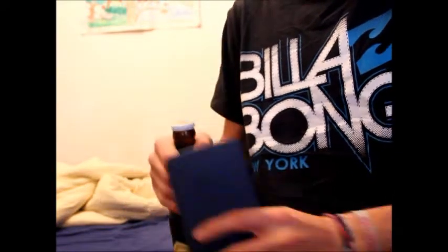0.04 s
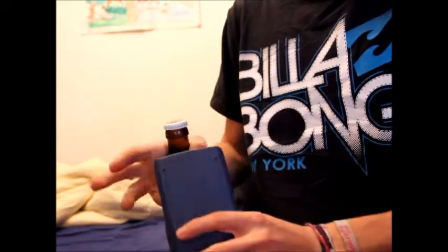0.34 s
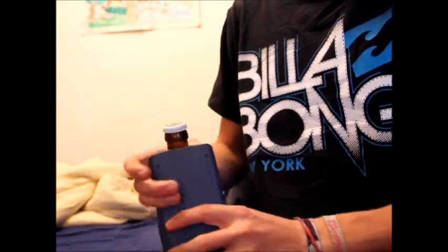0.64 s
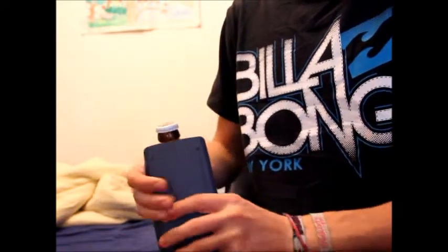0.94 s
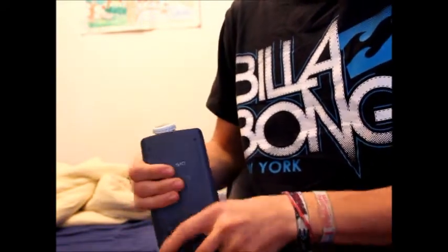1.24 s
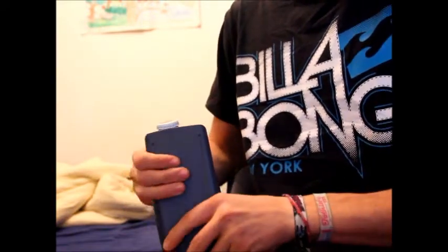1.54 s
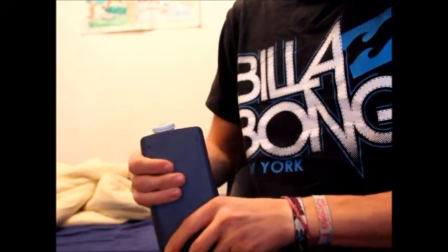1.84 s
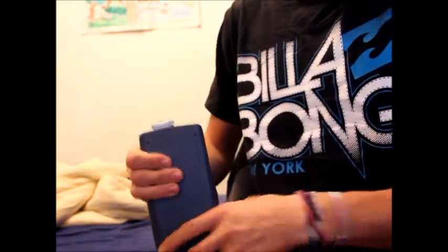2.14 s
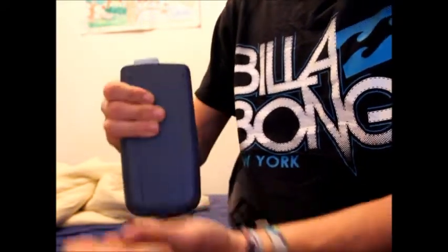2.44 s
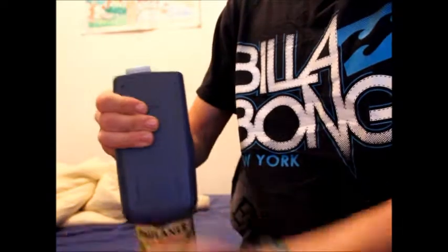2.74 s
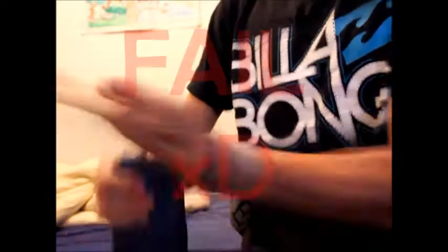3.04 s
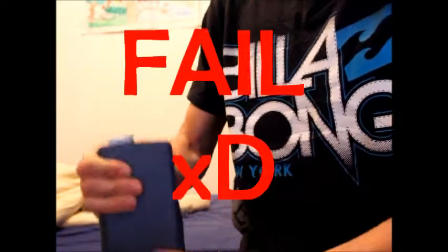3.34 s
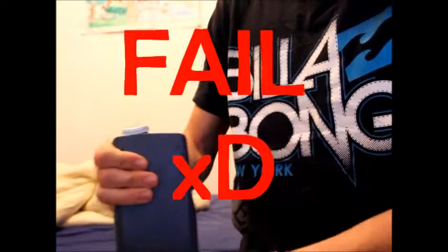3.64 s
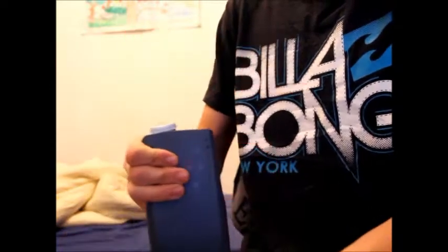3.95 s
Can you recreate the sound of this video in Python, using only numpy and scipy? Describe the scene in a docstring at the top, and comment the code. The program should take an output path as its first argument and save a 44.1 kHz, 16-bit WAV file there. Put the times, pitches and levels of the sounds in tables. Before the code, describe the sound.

A hard cover cracks sharply against a glass bottle, after faint taps, over a humming fan.

```python
"""A small bedroom, one microphone, a fan humming throughout.
A hard cover is fitted against a glass beer bottle with faint knocks, taps, ticks and rubs.
With a swing of the arm it is jerked against the bottle: both ring in one sharp crack that overloads
the microphone, and a lighter click follows. The recorder's gain ducks at the crack and creeps back."""
import sys
import numpy as np
from scipy import signal
from scipy.fft import rfft, irfft
from scipy.io import wavfile
from scipy.ndimage import minimum_filter1d, map_coordinates

SR = 44100
rng = np.random.default_rng(int(sys.argv[2]) if len(sys.argv) > 2 else 0)


def wav_out(sig):
    """Save sig, one row per channel (or a flat mono array), as 16-bit PCM at SR to the path in sys.argv[1]."""
    wavfile.write(sys.argv[1], SR, np.round(np.clip(np.atleast_2d(sig).T, -1, 1) * 32767).astype(np.int16))


N = 176400

# noise of a hard contact (frequency [Hz], relative level [dB])
CONTACT_COLOUR = [(40, -19), (130, -15), (220, -19), (300, -10), (480, -4), (900, -11), (1700, -26),
                  (2900, -4), (4200, -4), (7000, -6), (8600, -8.5), (11000, -15), (15000, -4)]
# spectrum of a dry click or knock (frequency [Hz], relative level [dB])
CLICK_COLOUR = [(60, -37), (350, -11), (900, -6), (1800, 6), (3300, -1.5), (5500, -13.5), (9000, -25.5),
                (15000, -39)]


def crack(at_s=3.1285):
    """The hard blow: cover and bottle snap and ring, their surfaces chatter, the room answers."""
    # cover and bottle struck hard (frequency [Hz], relative level [dB], t60 [s])
    body_modes = [(459, -3, 0.032), (345, -20.5, 0.14), (674, -7, 0.03), (1128, -11.5, 0.04),
                  (1214, -10, 0.032), (1440, -12, .03), (1500, -13, 0.039), (1650, -13, 0.13),
                  (1850, -9.5, 0.033), (2292, -2, 0.025), (2824, -15, 0.03), (3430, -8.5, 0.031),
                  (3720, -13, 0.031), (3990, -12.5, 0.025), (5250, -8.5, 0.012), (6210, -14.5, 0.019),
                  (7250, -14, 0.021), (8640, -11.5, 0.012), (10770, -14, 0.013), (13700, -13, 0.012),
                  (14300, -30, .014)]
    # air humming on inside the cover (frequency [Hz], level [dB], t60 [s])
    cavity_modes = [(421, -21.5, 0.36)]
    # spectrum of the chatter and the room's echo (frequency [Hz], relative level [dB])
    echo_colour = [(40, -11), (150, 4), (220, -2), (380, 5.5), (600, 2), (900, -14), (1300, 1.5),
                   (1750, 14.5), (2050, 5.5), (2400, 10), (3500, 2), (4200, -0.5), (6000, -12),
                   (10000, -17), (15000, -17)]
    out, t = np.zeros(N), times(SR // 2)
    snap = amp(1.5) * np.exp(-(t / 0.0011) ** 2)  # the instant of contact
    burst = noise(CONTACT_COLOUR, len(t)) * (snap + decay(t, db=-6, t60=0.014))
    add(out, at_s, room(burst + ring(body_modes, t), wet_db=-13.5))
    chatter = noise(echo_colour, len(t)) * decay(t, db=-13.5, t60=0.14)
    add(out, at_s, chatter + ring(cavity_modes, t))
    echo = signal.fftconvolve(pulse(echo_colour, tilt_db=0.5), room_tail())
    add(out, at_s, amp(11) * echo)
    return out


def knocks():
    """The cover meets the bottle: a short contact noise and a dull ring."""
    # soft blows (time [s], level [dB])
    blows = [(0.8793, -32), (0.8846, -37.5), (0.892, -30.5)]
    # their ring (frequency [Hz], relative level [dB], t60 [s])
    modes = [(416, -23, 0.049), (483, 2, 0.086), (710, -2.5, .018), (1517, -1, 0.028), (2150, -8, 0.049),
             (2520, -2.5, 0.018), (3470, -26, 0.014), (5300, -23, .015)]
    out, t = np.zeros(N), times(SR // 4)
    for at_s, db in blows:
        contact = noise(CLICK_COLOUR, len(t)) * decay(t, db=-1.5, t60=0.023)
        add(out, at_s, amp(db) * room(ring(modes, t) + contact, wet_db=-7))
    return out


def clicks():
    """Two clicks, each a single pulse that the room draws out."""
    # (time [s], level [dB], treble tilt [dB/octave])
    events = [(1.145, -17.5, -2.5), (3.32, -0.5, 0.5)]
    out = np.zeros(N)
    for at_s, db, tilt_db in events:
        add(out, at_s, amp(db) * room(pulse(CLICK_COLOUR, tilt_db), wet_db=2))
    return out


def glass_taps():
    """Light taps ring the glass, each with a main note of its own."""
    # (time [s], level [dB], main note [Hz], its t60 [s], treble tilt [dB/octave])
    taps = [(1.1733, -35, 1490, 0.14, -1.5), (3.0822, -32.5, 3470, 0.027, 2.5)]
    # brief ring common to the taps (frequency [Hz], level before tilt [dB], t60 [s])
    glass_modes = [(780, -0.5, 0.01), (1120, -3.5, 0.023), (2280, -3.5, 0.018), (3880, -4.5, .025),
                   (5450, -10, .02), (10000, -20, 0.022)]
    out, t = np.zeros(N), times(SR // 4)
    for at_s, db, note_hz, note_t60, tilt_db in taps:
        modes = [(note_hz, 0, note_t60)]
        modes += [(hz, level + tilt_db * np.log2(hz / note_hz), t60) for hz, level, t60 in glass_modes]
        contact = noise(CONTACT_COLOUR, len(t)) * decay(t, db=-14, t60=0.018)
        add(out, at_s, amp(db) * room(ring(modes, t) + contact, wet_db=-4.5))
    return out


def grip_ticks():
    """The cover slips in the hand with tiny bright ticks."""
    # shifts of the grip (time [s], level [dB])
    slips = [(2.633, -41.5), (3.353, -43), (3.4483, -37.5), (3.4525, -43.5)]
    # tick spectrum (frequency [Hz], relative level [dB])
    colour = [(300, -20), (2000, -6), (3800, 7), (6000, -6), (7500, 0), (9000, -12), (11500, 1),
              (13500, -10), (16000, -10)]
    out, t = np.zeros(N), times(SR // 10)
    for at_s, db in slips:
        tick = noise(colour, len(t)) * decay(t, db, t60=0.016)
        add(out, at_s, room(tick, wet_db=-16))
    return out


def rubs():
    """Skin slides on the cover with a soft, uneven hiss."""
    # strokes (middle [s], half length [s], level [dB])
    strokes = [(0.195, 0.031, -56.5), (0.262, 0.055, -61), (0.894, .025, -60), (1.238, 0.016, -58),
               (1.287, 0.056, -55)]
    # friction spectrum (frequency [Hz], relative level [dB])
    colour = [(200, -29), (1500, -4), (5000, 2), (9000, -6), (13500, -1), (16000, -4)]
    t = times(N)
    level = sum(amp(db) * np.exp(-((t - mid_s) / half_s) ** 2) for mid_s, half_s, db in strokes)
    return level * noise(colour, N) * amp(3.9 * wobble(150))


def arm_swing(peak_s=3.064, half_s=0.13, db=-46.5):
    """The arm stirs air and sleeve: a soft rush that swells just before the blow."""
    # rush spectrum (frequency [Hz], relative level [dB])
    colour = [(60, -18), (300, 3), (900, 0), (2000, 1), (4500, -9), (9000, -17.5), (15000, -28)]
    swell = np.exp(-((times(N) - peak_s) / half_s) ** 2)
    return amp(db) * swell * noise(colour, N)


def fan(rush_db=-46, flutter_db=2.4, drift_rad=1.1):
    """The fan's steady rush, with hum tones that waver in level and phase."""
    # moving air (frequency [Hz], relative level [dB])
    colour = [(25, -17), (60, -15), (130, -11.5), (160, -7), (210, -11), (300, -4), (480, -0.5), (700, -1),
              (1100, 0.5), (1600, 1), (2250, 0.5), (2500, -3.5), (3300, -7.5), (4800, -9), (5400, -14.5),
              (7000, -17.5), (9000, -21.5), (15500, -21.5)]
    # fan and mains tones (frequency [Hz], rms level [dB])
    tones = [(100, -77), (398.4, -64.5), (499, -61), (1507, -64), (1996, -61), (2294, -57), (2794, -65.5)]
    hum, t = np.zeros(N), times(N)
    for hz, db in tones:
        level = np.sqrt(2) * amp(db + flutter_db * wobble(9))
        hum += level * np.sin(2 * np.pi * hz * t + drift_rad * wobble(18))
    return hum + amp(rush_db) * noise(colour, N)


def room(x, wet_db):
    """What reaches the microphone: direct sound, near reflections and a diffuse tail."""
    # reflections off nearby surfaces (delay [s], gain [linear])
    walls = [(.0094, 0.34), (0.0152, 0.16), (.0177, 0.18)]
    response = amp(wet_db) * room_tail()
    response[0] += 1
    for delay, gain in walls:
        response[round(delay * SR)] += gain
    return signal.fftconvolve(x, response)


def room_tail(onset_s=0.0062):
    """The bedroom's reverberation, of energy 1; the bass lingers longest."""
    # decay times (frequency [Hz], t60 [s])
    t60s = [(120, 0.54), (500, 0.29), (1800, 0.37), (4000, 0.28), (8000, 0.29), (15000, 0.14)]
    # spectrum before the decay (frequency [Hz], relative level [dB])
    colour = [(100, -7), (400, 2.5), (900, 4), (2000, -4.5), (4000, 5.5), (8000, 4.5), (15000, 7)]
    hz, t, bands = signal.stft(noise(colour, SR // 2), SR, nperseg=256)
    bands = bands * decay(t, db=0, t60=along(t60s, hz)[:, None])
    _, tail = signal.istft(bands, SR, nperseg=256)
    tail *= 1 - np.exp(-(times(len(tail)) / onset_s) ** 2)
    return tail / np.linalg.norm(tail)


def ring(modes, t, scatter_rad=0.81, bass_cut_hz=318):
    """Damped modes set off together; a small body radiates little bass."""
    x = sum(decay(t, db, t60) * np.sin(2 * np.pi * hz * t + rng.normal(0, scatter_rad))
            for hz, db, t60 in modes)
    return signal.sosfilt(signal.butter(2, bass_cut_hz, "high", fs=SR, output="sos"), x)


def pulse(colour, tilt_db, size=2048):
    """A coloured click of energy 1, tilted by tilt_db per octave."""
    hz = np.fft.rfftfreq(size, 1 / SR)
    spectrum = amp(along(colour, hz) + tilt_db * np.log2((hz + 100) / 2000))
    cepstrum = irfft(np.log(spectrum))
    cepstrum[1:size // 2] *= 2  # minimum phase: the energy comes at the start
    cepstrum[size // 2 + 1:] = 0
    click = irfft(np.exp(rfft(cepstrum)))
    return click / np.linalg.norm(click)


def noise(colour, count):
    """Coloured noise of rms 1."""
    gains = amp(along(colour, np.fft.rfftfreq(count, 1 / SR)))
    x = irfft(rfft(rng.standard_normal(count)) * gains, count)
    return x / np.sqrt(np.mean(x ** 2) + 1e-20)


def wobble(rate):
    """A smooth random curve, rate knots a second."""
    return map_coordinates(rng.standard_normal(N // 100), [times(N) * rate], mode="wrap")


def decay(t, db, t60):
    """An envelope that starts at db and falls 60 dB in t60 seconds."""
    return amp(db - 60 * t / t60)


def amp(db):
    """Decibels to gain."""
    return 10 ** (np.asarray(db) / 20)


def along(points, hz):
    """Interpolate (frequency [Hz], value) points on a log axis."""
    knots_hz, values = np.transpose(points)
    return np.interp(np.log(hz + 1), np.log(knots_hz + 1), values)


def times(count):
    """Seconds of each sample."""
    return np.arange(count) / SR


def add(out, at_s, x):
    """Mix x into out from at_s on."""
    part = out[round(at_s * SR):][:len(x)]
    part += x[:len(part)]


def ducking(x, above_db=6, share=0.36, attack_s=0.0095, hold_s=0.33, recover_db_per_s=47):
    """The recorder's gain in dB: falls on a loud peak, holds, then recovers steadily."""
    wanted_cut = share * np.maximum(20 * np.log10(np.abs(x) + 1e-9) - above_db, 0)
    half_hold = int(hold_s * SR) // 2
    held_cut = -minimum_filter1d(-wanted_cut, 2 * half_hold + 1, origin=half_hold)
    recovery = recover_db_per_s * times(N)
    cut = np.maximum.accumulate(held_cut + recovery) - recovery
    pole = np.exp(-1 / (attack_s * SR))
    return -signal.lfilter([1 - pole], [1, -pole], cut)


def scene():
    """Cover, bottle, arm and fan at one microphone."""
    cover_and_bottle = crack() + knocks() + clicks() + glass_taps() + grip_ticks() + rubs()
    return (cover_and_bottle + arm_swing() + fan())[None]


def record(dry):
    """The recorder ducks its gain, clips at full scale and cuts the highest treble."""
    clipped = np.clip(dry * amp(ducking(dry[0])), -1, 1)
    top_hz = 15700
    return signal.sosfilt(signal.ellip(12, 0.1, 90, top_hz, fs=SR, output="sos"), clipped)


dry = scene()
out = record(dry)
wav_out(out)
```